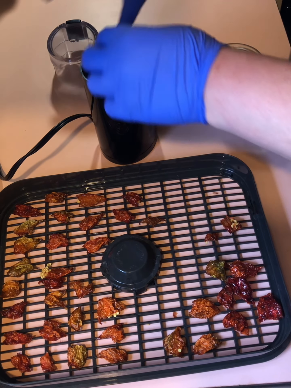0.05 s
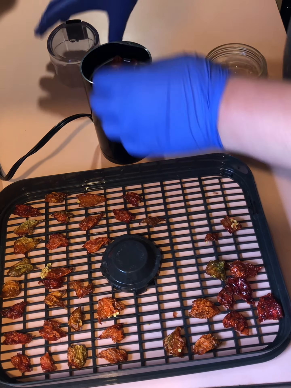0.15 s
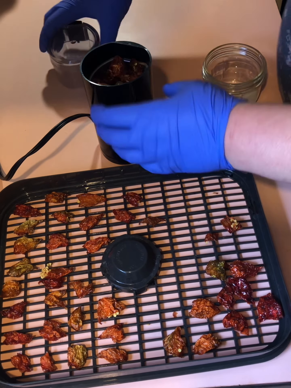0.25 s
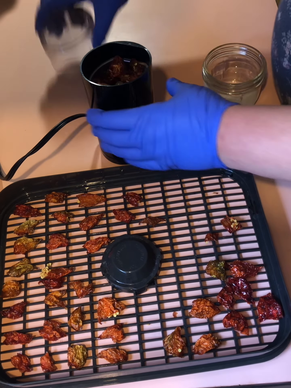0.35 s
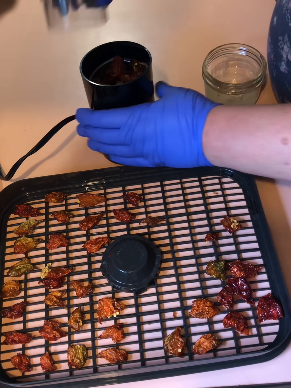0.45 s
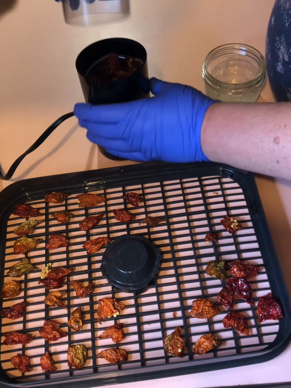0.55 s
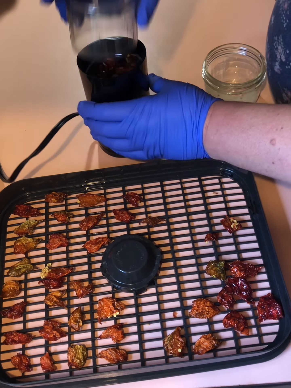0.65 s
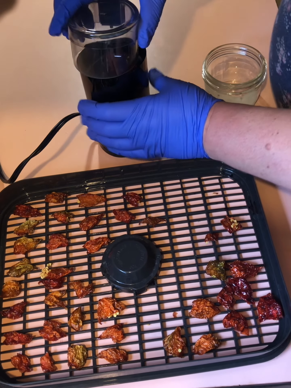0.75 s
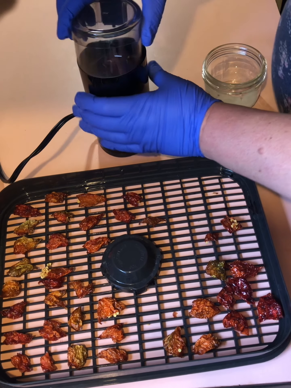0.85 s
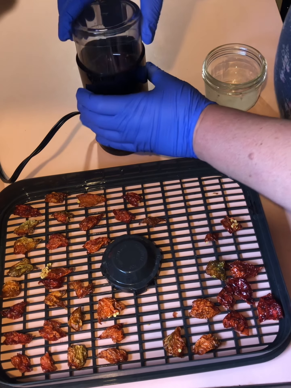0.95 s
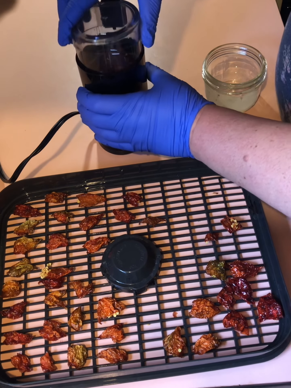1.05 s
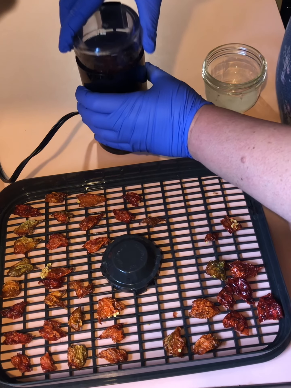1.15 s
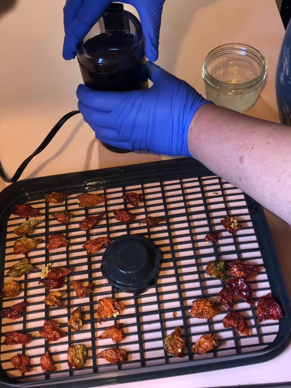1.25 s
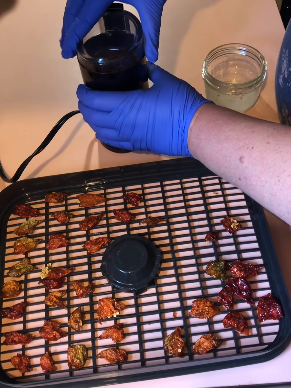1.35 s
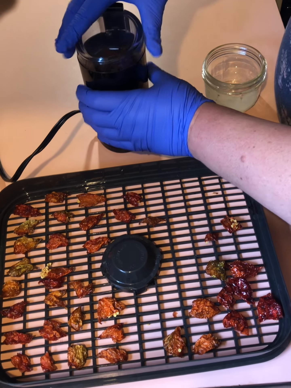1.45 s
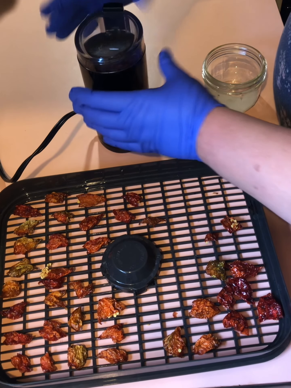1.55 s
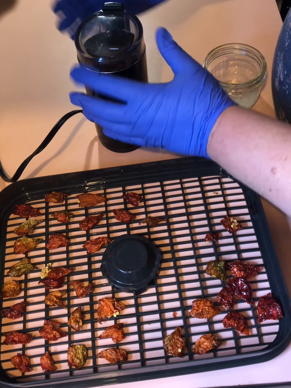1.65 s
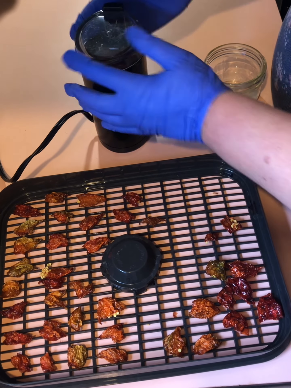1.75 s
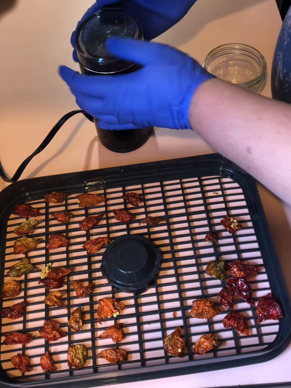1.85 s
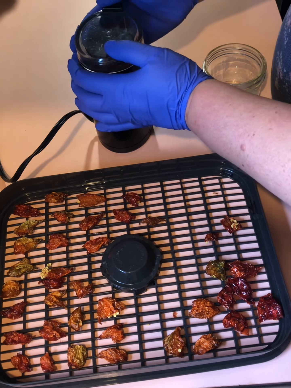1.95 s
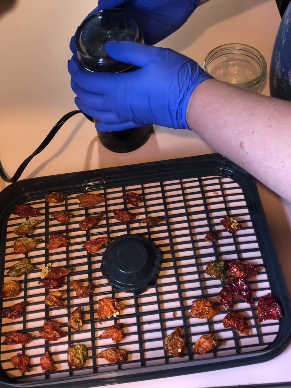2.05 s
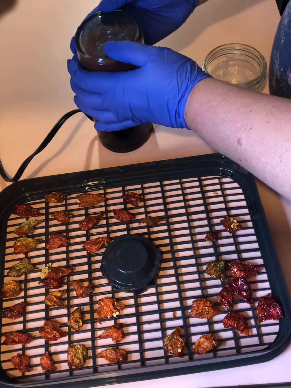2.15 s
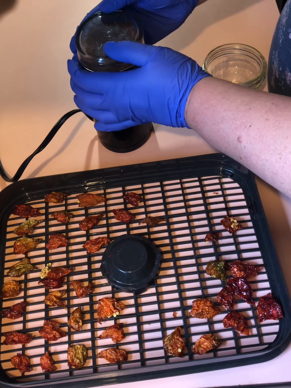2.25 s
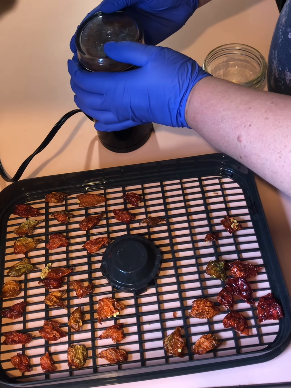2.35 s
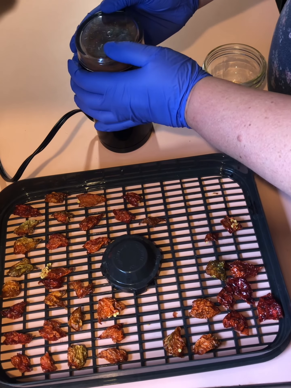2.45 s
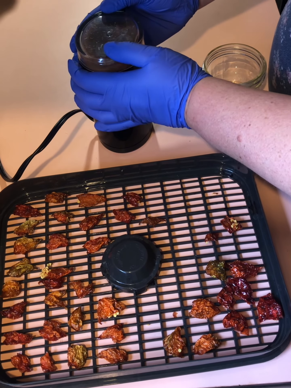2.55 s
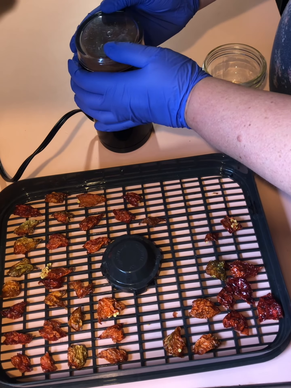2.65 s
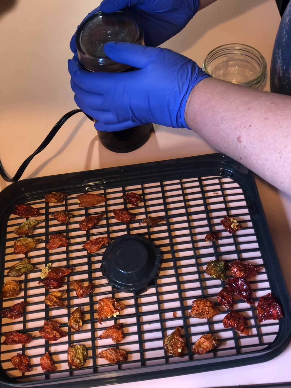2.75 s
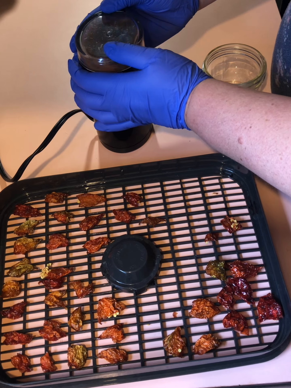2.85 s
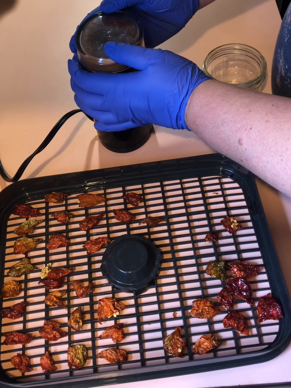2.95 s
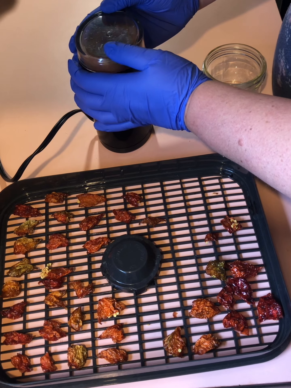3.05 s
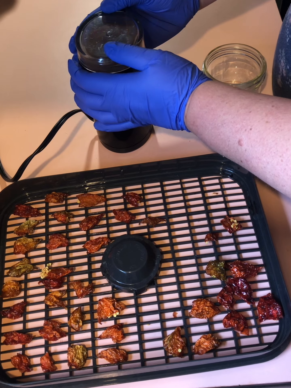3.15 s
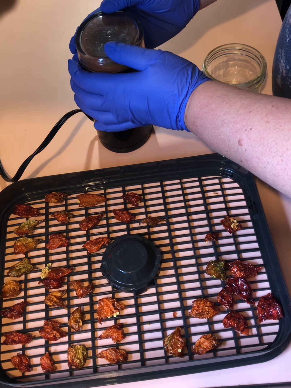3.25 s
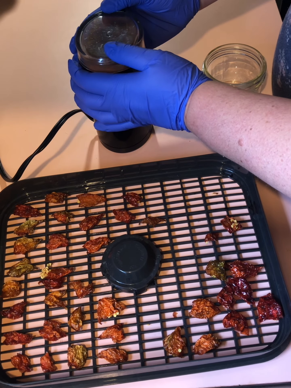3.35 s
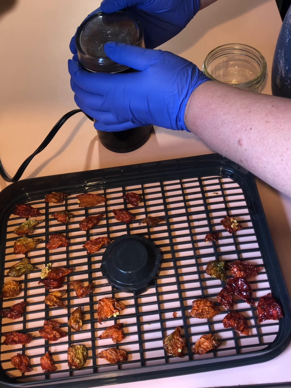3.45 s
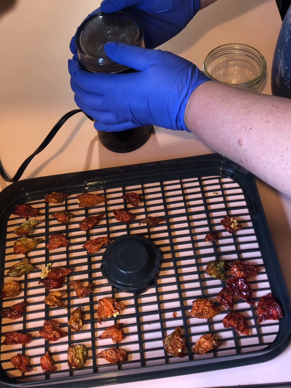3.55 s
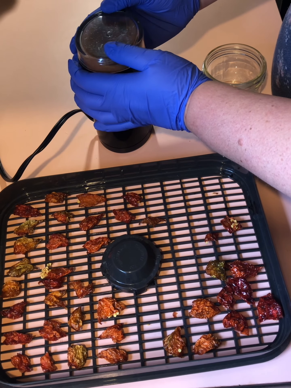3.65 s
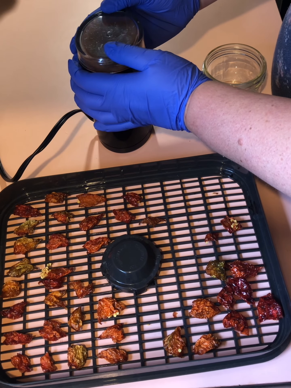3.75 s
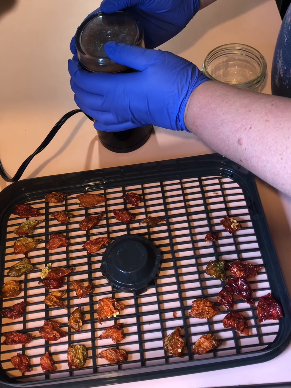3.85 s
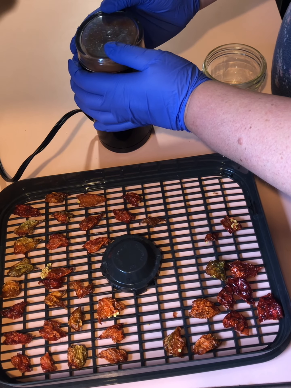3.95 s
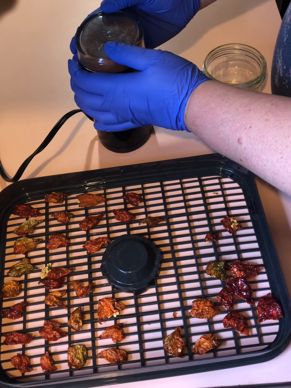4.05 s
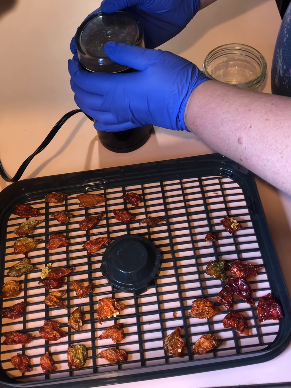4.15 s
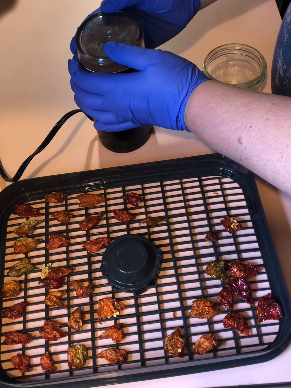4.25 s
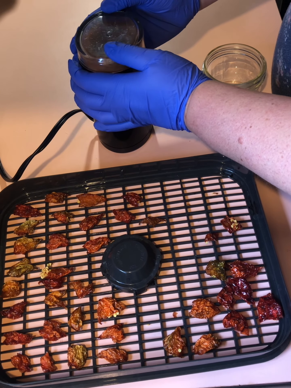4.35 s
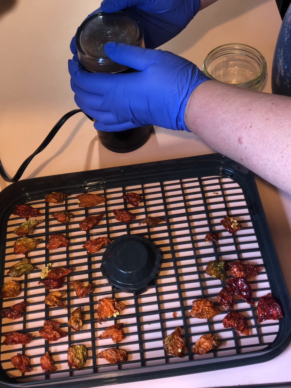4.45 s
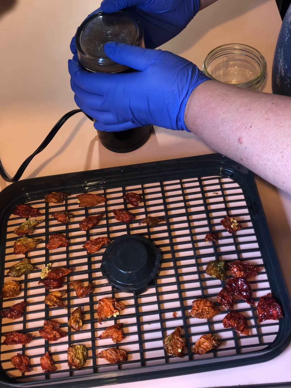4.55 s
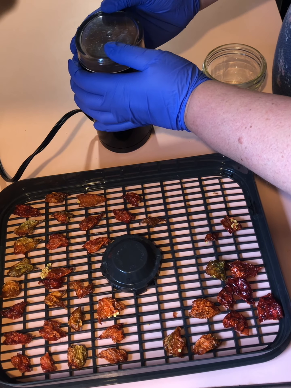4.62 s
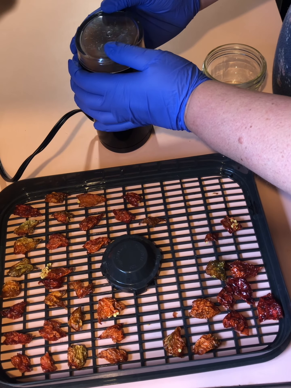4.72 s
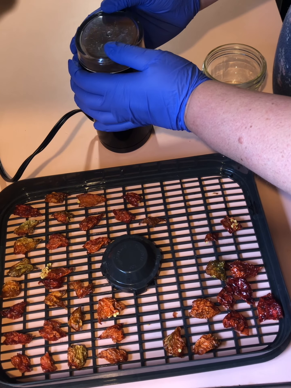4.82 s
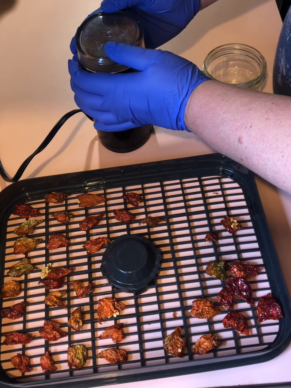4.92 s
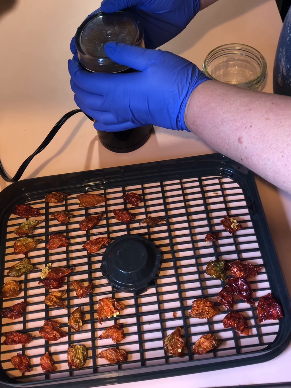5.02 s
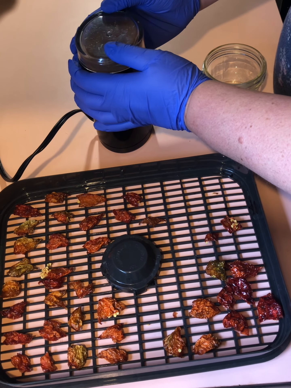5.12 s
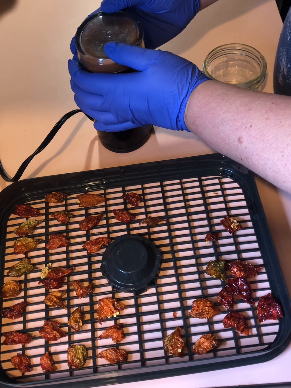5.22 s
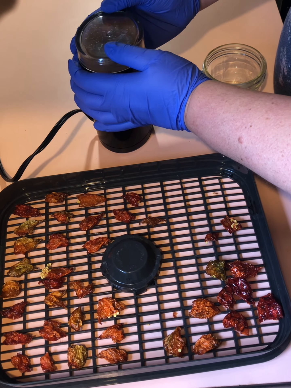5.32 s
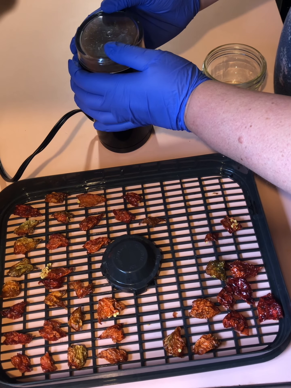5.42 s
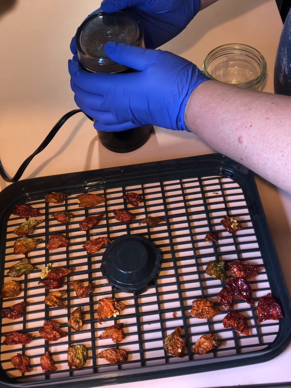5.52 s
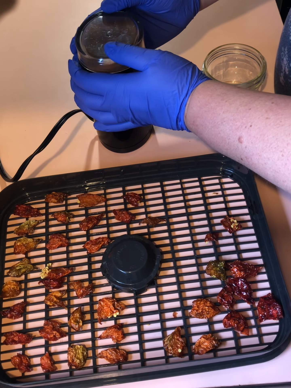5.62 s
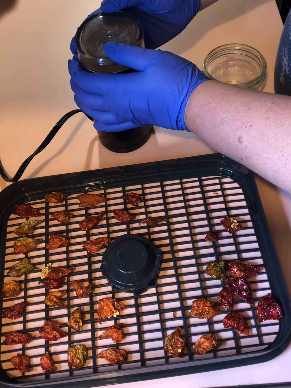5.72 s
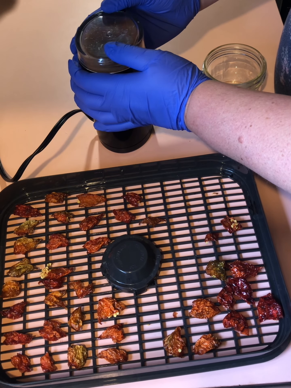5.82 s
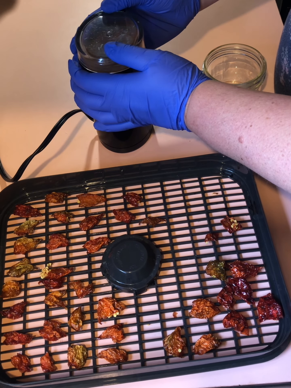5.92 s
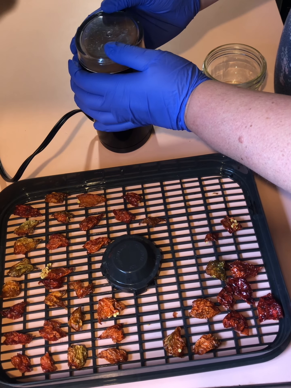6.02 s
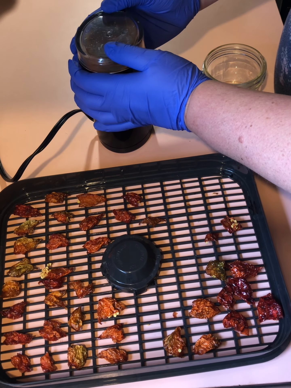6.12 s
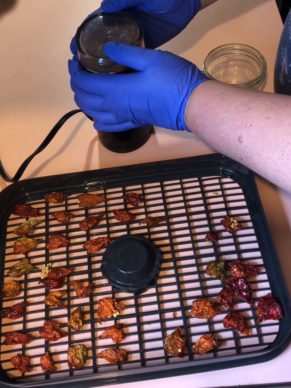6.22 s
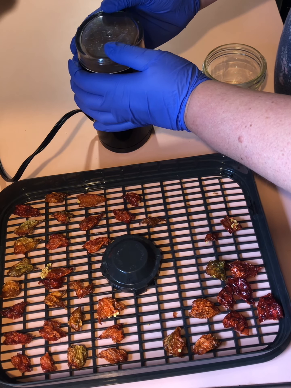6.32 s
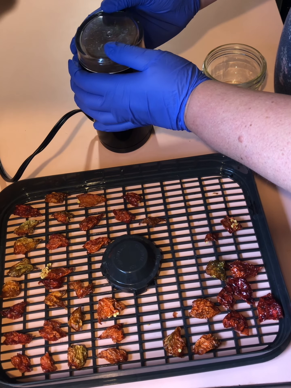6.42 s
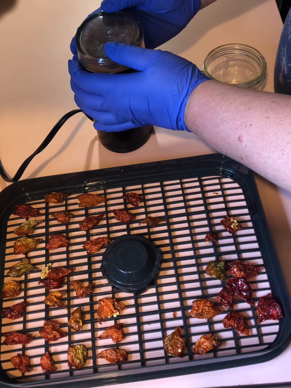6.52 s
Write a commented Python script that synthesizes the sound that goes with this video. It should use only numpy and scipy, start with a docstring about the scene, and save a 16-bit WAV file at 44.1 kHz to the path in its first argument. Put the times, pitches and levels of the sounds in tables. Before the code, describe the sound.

Gloved hands knock and slide a plastic lid onto a small electric grinder, then it whines up and grinds dried peppers over faint fan hum.

```python
"""An electric blade grinder whines up to speed in a small kitchen: orders of the rotor pitch through housing
resonances, with side tones of the mains ripple. Dried peppers are smashed and hurled round the cup: random
impacts filtered by the cup. First a gloved hand sets the plastic lid on and presses it down: struck modes,
chatter and rubbing noise. The fan of a food dehydrator hums throughout: low tones over air noise."""
import sys
import numpy as np
from scipy import signal
from scipy.fft import rfft, irfft
from scipy.io import wavfile

SR = 44100
rng = np.random.default_rng(int(sys.argv[2]) if len(sys.argv) > 2 else 0)


def inscribe(sig):
    """Save sig as 16-bit PCM at rate SR to the path in sys.argv[1].

    A 1-D sig is mono; a 2-D sig holds one channel per row.
    Samples are clipped to [-1, 1] before scaling.
    """
    pcm = np.round(np.clip(np.atleast_2d(sig).T, -1, 1) * 32767)
    wavfile.write(sys.argv[1], SR, pcm.astype(np.int16))


N = 290178
TIME_S = np.arange(N) / SR

# Dehydrator fan tones. Each row: frequency in Hz, level in dB, unsteadiness from 0 to 1.
FAN_TONES = [(56, -55, 0.1), (75.4, -52.5, 0), (121.6, -61, 0), (199.8, -47.5, 0)]
# Fan air noise. Each row: frequency in Hz, relative density in dB per Hz.
FAN_AIR_COLOUR = [(20, -71), (40, -33.5), (70, 16), (100, -3), (150, 0.5), (230, -0.5), (310, -5.5),
                  (400, -2.5), (550, -10), (1000, -11.5), (2500, -20.5), (6000, -29.5), (16000, -39)]

# A glove rubs over plastic. Each row: start in seconds, length in seconds, rustle in dB, fine hiss in dB.
GLOVE_RUBS = [(0.09, 0.04, -57, -62), (0.15, 0.12, -57, -59), (0.29, 0.18, -55.5, -70),
              (0.495, .14, -48.5, -64), (0.86, 0.18, -51, -66), (1.08, 0.17, -57, -56.5),
              (1.19, .075, -63, -59), (1.47, 0.08, -58.5, -75), (1.625, .048, -51.5, -62),
              (1.68, .07, -63, -71), (2.082, 0.056, -51, -58)]
# Dull rustle of the glove. Each row: frequency in Hz, relative density in dB per Hz.
RUSTLE_COLOUR = [(300, 5), (900, -4), (2600, -1.5), (3600, -6), (6000, -13), (16000, -34)]
# Fine hiss of the glove. Each row: frequency in Hz, relative density in dB per Hz.
HISS_COLOUR = [(2000, -41), (6000, 1), (9000, 2), (16000, -3)]
# The lid slides on the cup. Each row: start in seconds, length in seconds, singing rim in dB, dull judder in dB.
LID_SLIDES = [(0.213, 0.078, -52, -48), (0.51, 0.082, -66, -57), (0.665, 0.027, -57, -68),
              (0.77, 0.13, -68, -40.5), (0.92, .045, -43, -39.5), (1.22, 0.086, -57, -45)]
# Hollow under the sliding lid. Each row: frequency in Hz, relative density in dB per Hz.
JUDDER_COLOUR = [(60, -21), (140, 0), (240, 2), (330, -10), (450, -5.5), (750, -13), (1100, -18),
                 (4000, -27), (16000, -58)]
RUB_SWELL_SHARE, RUB_RELEASE_S = 0.29, 0.012   # swell as a share of the stroke; release time constant

# Contacts of lid, cup and worktop.
# Each row: time in seconds, then relative levels of thump, hollow ring, clack and tick in dB.
CONTACTS = [(0.066, -53, -55, -47, -24.5), (0.074, -50, -54, -49, -32), (0.154, -51, -56, -60, -42),
            (0.32, -39, -33.5, -50, -62), (0.7437, -27, -12, -22.5, -28.5), (0.7513, -29, -30, -17.5, -25),
            (0.759, -15.5, -11.5, -48, -40), (0.914, -30, -32, -35.5, -48), (0.937, -35, -44, -22, -28),
            (0.946, -29, -43, -28.5, -32), (1.12, -34.5, -53, -50, -59), (1.212, -50, -41, -38, -58),
            (1.22, -43, -41, -34, -54), (1.26, -35, -36, -29, -49), (1.284, -37, -43, -37.5, -61),
            (1.623, -57, -55, -41.5, -45), (1.825, -59, -60, -42, -63), (2.061, -56, -55, -51, -52)]
# Grinder rocking on the worktop. Each row: frequency in Hz, relative level in dB, t60 in seconds.
BASE_MODES = [(148, 0, .06), (172, -6, .06), (232, -2, .065), (265, -8, .05)]
# Hollow ring of the contacts. Each row: frequency in Hz, relative level in dB, t60 in seconds.
HOLLOW_MODES = [(450, -15, .04), (652, 2, .085), (690, -9, .05), (745, -3, .07), (920, -12, .04),
                (1130, -15, .035)]
# Wall of the lid. Each row: frequency in Hz, relative level in dB, t60 in seconds.
LID_MODES = [(1096, -12, 0.061), (1530, -9, .05), (1765, -5, .04), (1990, -4, 0.024), (2155, -8, 0.091),
             (2620, -25, 0.16), (3010, -21, .17), (3800, -18, 0.13)]
# Noise of the clacks. Each row: frequency in Hz, relative density in dB per Hz.
CLACK_COLOUR = [(300, 1), (1000, 0), (2000, 1), (3600, -0.5), (4600, -8), (7000, -15), (16000, -23)]
# Noise of the ticks. Each row: frequency in Hz, relative density in dB per Hz.
TICK_COLOUR = [(1000, 1), (4000, 1), (7500, 4.5), (11000, -4.5), (16000, -10)]
# The lid's tab knocks in its slot. Each row: time in seconds, relative level in dB.
LATCH_KNOCKS = [(1.2615, -18.5), (1.826, -40)]
# Tab and slot. Each row: frequency in Hz, relative level in dB, t60 in seconds.
LATCH_MODES = [(218, -9, 0.16), (1930, -16, 0.024), (2000, 0.5, 0.026), (3370, -27, 0.013)]

# Grinder jolted on the worktop. Each row: frequency in Hz, relative level in dB, t60 in seconds.
KICK_MODES = [(87, -3.8, 0.48), (136, -4.0, 0.12)]
# Whole pods tumbling. Each row: frequency in Hz, relative density in dB per Hz.
POD_COLOUR = [(200, -9.5), (500, -6.5), (900, -3), (1400, -10), (1900, 5), (2400, -3.5), (3200, -3.5),
              (6000, -4), (16000, -25)]
# Fine crumbs swirling in the cup. Each row: time in seconds, relative level in dB.
SWIRL = [(2.33, -27), (2.47, -19.5), (2.75, -23), (3.12, -20), (3.27, -25), (3.4, -20.5), (3.78, -23.5),
         (3.95, -19), (4.12, -24), (4.22, -18.5), (4.4, -23.5), (4.85, -23.5), (5.18, -20), (5.32, -22),
         (5.75, -22.5), (6, -20.5), (6.57, -22.5)]
# The blade bites a larger piece. Each row: peak time in seconds, relative level in dB, length in seconds.
BITES = [(2.136, -7.5, 0.007), (2.152, -11, 0.0063), (2.242, -13.5, .009), (2.274, -16.5, 0.029),
         (2.367, -6, 0.0025), (2.389, -14, 0.013), (2.51, -13.5, 0.018), (2.535, -15.5, .009),
         (2.586, -13.5, 0.016), (2.62, -20, 0.008), (2.691, -15.5, .007), (2.716, -17.5, 0.012),
         (2.749, -15, .008), (2.769, -13.5, 0.0078), (2.909, -16.5, 0.018), (2.929, -15, 0.02),
         (3.022, -15.5, .009), (3.056, -13.5, 0.0053), (3.132, -20, 0.0052), (3.19, -17.5, 0.013),
         (3.212, -16, .012), (3.305, -18.5, 0.024), (3.339, -14, 0.014), (3.44, -17, 0.0061),
         (3.603, -18, 0.017), (3.627, -14, 0.0052), (3.689, -14.5, 0.015), (3.841, -19.5, 0.0093),
         (3.866, -19, 0.014), (3.91, -20.5, 0.0092), (4.024, -17.5, 0.026), (4.24, -19, 0.0081),
         (4.284, -18.5, 0.0092), (4.413, -20, 0.01), (4.452, -21.5, 0.02), (4.628, -18, 0.023),
         (4.709, -20.5, 0.011), (4.894, -19, .01), (4.94, -18, 0.0041), (5.01, -13.5, 0.0072),
         (5.154, -13, 0.0051), (5.204, -15.5, 0.0065), (5.275, -15, 0.0021), (5.357, -19, 0.018),
         (5.718, -13.5, 0.0047), (5.777, -16.5, 0.0068), (5.806, -21, .008), (5.845, -14.5, 0.0029),
         (5.98, -19, 0.012), (6.107, -15, 0.0066), (6.445, -15.5, .01)]
# Coarser bits. Each row: frequency in Hz, relative density in dB per Hz.
SHOWER_COLOUR = [(500, -1), (1500, -4), (3300, 2.5), (6000, 0.0), (11500, -1.5), (16000, -1.5)]
# Crumbs on the cup. Each row: frequency in Hz, relative density in dB per Hz.
CRUMB_COLOUR = [(150, -23), (320, -21.5), (420, -13.5), (560, -17), (850, -15), (1250, -14), (1750, -11.5),
                (2300, -7.5), (2750, -6.5), (3300, -3), (4000, -3), (6300, -6), (8200, -0.5), (11600, -1.5),
                (16000, -5)]
# Resonances of cup and lid. Each row: frequency in Hz, width in Hz, lift in dB.
CUP_MODES = [(424, 72, 9.5), (735, 48, 7), (965, 265, 10), (1476, 180, 8.5), (2010, 250, 7), (2460, 120, 6),
             (3010, 220, 6), (3230, 130, 3.5), (3830, 205, 7.5), (4060, 140, 3.5), (4624, 115, 7),
             (5935, 710, 5.5), (7370, 190, 4), (8800, 550, 2.5), (9850, 150, 5.5), (10520, 220, 3),
             (11600, 430, 3.5)]

# Rising whistle of the motor's run-up. Each row: time in seconds, pitch in Hz, level in dB.
RUN_UP_WHISTLE = [(2.22, 2850, -57), (2.25, 3065, -30), (2.285, 3260, -17), (2.32, 3400, -28),
                  (2.36, 3520, -29), (2.38, 3700, -62)]
# Changing load drags or frees the blade. Each row: time in seconds, pitch offset in Hz.
LOAD = [(2.3, 7.98), (2.6, -11.5), (2.88, -0.16), (3.47, -1.78), (3.56, -0.1), (4.08, -4), (4.15, -3),
        (4.62, 4), (4.87, 4), (5.22, -0.33), (5.63, 0.13), (5.74, -1.04), (6.23, -4), (6.57, -0.2)]
# Orders 1 to 5 of the whine. Each row: relative level at full speed in dB, growth with speed in dB per octave,
# swell once only powder is left in dB per second.
WHINE_ORDERS = [(-31.5, 9.5, 0), (-33, 16.5, 2.1), (-30, 21, 0.8), (-43.5, 13, 4.5), (-33, 20.5, -0.5)]
# Weaker lines. Each row: order, multiples of the ripple frequency added, relative level at full speed in dB.
UPPER_ORDERS = [(2, 1, -44), (3, -1, -52), (3, 1, -42), (4, -1, -45.5), (4, 1, -43), (5, -1, -50),
                (5, 1, -40), (6, 0, -35), (6, 1, -43), (7, -1, -49), (7, 0, -40), (7, 1, -36), (8, 0, -34),
                (8, 1, -41), (9, 0, -37.5), (10, 0, -41.5), (11, 0, -43), (16, 0, -36.5), (17, 0, -38),
                (19, 0, -37.5), (21, 0, -37), (22, 0, -37), (23, 0, -38)]
# Housing resonances and dips. Each row: frequency in Hz, width in Hz, lift in dB.
HOUSING = [(295, 41, 11.5), (424.3, 68.5, 16), (467, 25, 7.5), (487.2, 3.5, -6.5), (504.4, 4.1, -4.5),
           (514.2, 15, 6.5), (842, 25, 11), (1034.6, 47, 4.5), (1177, 73, 13.5), (1290, 45, 9.5),
           (1392, 86, -9.5), (1527, 14, 5), (1895, 90, 11.5), (1998, 42, 14), (2578, 144, 6)]
SWITCH_ON_S, POWDER_FROM_S = 2.131, 4.75
FULL_SPEED_HZ, RIPPLE_HZ = 514, 120
SPIN_UP_HZ, SPIN_UP_S = 310.3, 0.150   # fast pitch gain and time constant: the rotor gathers speed
EASING_HZ, EASING_S = 109.8, 0.820     # slow pitch gain and time constant: the pieces get smaller

# Room tail. Each row: frequency in Hz, relative density in dB per Hz.
ROOM_COLOUR = [(200, -24), (700, -6.5), (1500, 6.0), (2500, 1.0), (8000, 2), (16000, -11.0)]
BASS_CUT_HZ, TOP_CUT_HZ = 42, 15900


def from_db(db):
    """Amplitude ratio."""
    return 10 ** (np.asarray(db) / 20)


def rms_one(x):
    """Scale to rms 1."""
    return x / np.sqrt(np.mean(x ** 2) + 1e-20)


def in_time(rows):
    """Interpolate each column of a curve table at every sample."""
    time_s, *columns = np.transpose(rows)
    return [np.interp(TIME_S, time_s, column) for column in columns]


def drift(rate_hz):
    """Noise of rms 1 through two equal low-pass poles at rate_hz, computed every 40 samples."""
    step = 40
    r = np.exp(-2 * np.pi * rate_hz * step / SR)
    noise = rng.standard_normal(N // step + 2002)
    slow = signal.lfilter([1], [1, -2 * r, r * r], noise)[2000:]   # settled part
    return np.interp(np.arange(N) / step, np.arange(len(slow)), rms_one(slow))


def resonance_db(hz, resonances):
    """Summed lift of the resonances at a frequency."""
    return sum(lift / (1 + (2 * (hz - centre) / width) ** 2) for centre, width, lift in resonances)


def colour(x, spectrum, resonances=(), size=4096):
    """Minimum-phase filter of unit power gain: smooth spectrum with resonant lifts."""
    hz = np.fft.rfftfreq(size, 1 / SR)
    points_hz, points_db = np.transpose(spectrum)
    db = np.interp(np.log(hz + 1), np.log(points_hz), points_db)
    db = db + resonance_db(hz, resonances)
    # folding the cepstrum makes the response causal
    cepstrum = irfft(np.log(from_db(db)))[:size // 2]
    response = irfft(np.exp(rfft(2 * cepstrum, size)))
    return signal.fftconvolve(x, response / np.linalg.norm(response))[:N]


def ring(clicks, modes):
    """Clicks set every mode ringing as a dying sine."""
    out = np.zeros(N)
    for hz, db, t60_s in modes:
        r = from_db(-60 / (t60_s * SR))
        w = 2 * np.pi * hz / SR
        sine = signal.lfilter([0, np.sin(w)], [1, -2 * r * np.cos(w), r * r], clicks + 1e-18)
        out += from_db(db) * sine
    return out


def grains(per_s, spread_db):
    """Random impacts of uneven size and either sign; rms 1."""
    sizes = from_db(spread_db * np.minimum(rng.exponential(1, N), 4))
    signs = rng.choice([-1, 1], N)
    return rms_one(sizes * signs * (rng.random(N) < per_s / SR))


def strokes(rows):
    """Per level column, a gain that swells, holds and dies away at every stroke."""
    gains = 0
    for start_s, length_s, *levels_db in rows:
        swell = np.clip((TIME_S - start_s) / (RUB_SWELL_SHARE * length_s), 0, 1)
        release = np.exp(-np.clip((TIME_S - start_s - length_s) / RUB_RELEASE_S, 0, 20))
        gains = gains + np.outer(from_db(levels_db), swell * release)
    return gains


def kitchen(x, wet_db=-13, t60_s=0.3, gap_s=0.0045):
    """Add a short diffuse tail from the walls, thin in the lows and dull at the top."""
    t = TIME_S[:SR // 2]
    tail = rng.standard_normal(len(t)) * from_db(-60 * t / t60_s) * (t > gap_s)
    wet = signal.fftconvolve(x, tail / np.linalg.norm(tail))[:N]
    return x + from_db(wet_db) * colour(wet, ROOM_COLOUR)


def fan(air_db=-48):
    """Low tones, wavering where the table says so, over soft air noise."""
    out = from_db(air_db) * colour(rng.standard_normal(N), FAN_AIR_COLOUR)
    for hz, db, unsteady in FAN_TONES:
        phase = 2 * np.pi * (hz * TIME_S + rng.random())
        in_phase = (1 + unsteady * drift(3.9)) * np.cos(phase)
        quadrature = unsteady * drift(8.4) * np.sin(phase)
        out += np.sqrt(2) * from_db(db) * (in_phase + quadrature)
    return out


def gloves():
    """Rubber slides over plastic in tiny slips."""
    rustle_gain, hiss_gain = strokes(GLOVE_RUBS)
    rustle = colour(grains(per_s=5000, spread_db=0.0), RUSTLE_COLOUR)
    hiss = colour(grains(per_s=6400, spread_db=4.0), HISS_COLOUR)
    return rustle_gain * rustle + hiss_gain * hiss


def slide(catch_db=3):
    """The snug lid judders along the cup: its dragged rim sings, the hollow under it answers dully."""
    rim_gain, hollow_gain = strokes(LID_SLIDES)
    rim = rms_one(ring(grains(per_s=2700, spread_db=10.0), LID_MODES[4:]))
    hollow = colour(grains(per_s=900, spread_db=0.5), JUDDER_COLOUR, [(660, 120, 5)])
    return rim_gain * rim * from_db(catch_db * drift(30)) + hollow_gain * hollow


def chatter(blows, peak_s):
    """Tiny impacts that swell for peak_s and die as the rim seats."""
    r = np.exp(-1 / (peak_s * SR))
    swell = signal.lfilter([np.e * (1 - r)], [1, -2 * r, r * r], blows + 1e-18)
    return swell * grains(per_s=14000, spread_db=3.5)


def lid(thump_db=0.5, hollow_db=-3.5, wall_db=-3, clack_db=-5.5, tick_db=-1.5):
    """Each contact rocks the base, rings the hollow and the wall, and chatters for a few milliseconds."""
    time_s, *part_db = np.transpose(CONTACTS)
    clicks = np.zeros((4, N))
    clicks[:, (time_s * SR).astype(int)] = from_db(part_db)
    thump, hollow, clack, tick = clicks
    body = from_db(thump_db) * ring(thump, BASE_MODES) + from_db(hollow_db) * ring(hollow, HOLLOW_MODES)
    # a small, cushioned body
    body = signal.sosfilt(signal.butter(2, [135, 1100], "band", fs=SR, output="sos"), body)
    body = np.roll(body, int(0.00194 * SR))   # it yields a moment after the rim touches
    wall = from_db(wall_db) * ring(clack, LID_MODES)
    clacks = from_db(clack_db) * colour(chatter(clack, peak_s=0.003), CLACK_COLOUR)
    ticks = from_db(tick_db) * colour(chatter(tick, peak_s=0.0023), TICK_COLOUR)
    return body + wall + clacks + ticks


def latch():
    """Focused plastic knocks as the lid comes home and is gripped."""
    snaps = np.zeros(N)
    for time_s, db in LATCH_KNOCKS:
        snaps[int(time_s * SR)] = from_db(db)
    return ring(snaps, LATCH_MODES)


def kick(level_db=-31):
    """The starting torque jolts the grinder against the worktop."""
    jolt = np.zeros(N)
    jolt[int(SWITCH_ON_S * SR)] = from_db(level_db)
    return ring(jolt, KICK_MODES)


def pods(level_db=-27, breakup_s=0.77):
    """Whole pods knock about dully and fade as they are broken up."""
    left = np.exp(-np.maximum(TIME_S - SWITCH_ON_S, 0) / breakup_s)
    knocks = grains(per_s=2500, spread_db=1.0) * left * from_db(1.8 * drift(25))
    return from_db(level_db) * colour(knocks, POD_COLOUR)


def bite_power(bite_db=1.78):
    """Power of the showers: each bite strikes suddenly, then decays."""
    power = np.zeros(N)
    for peak_s, db, length_s in BITES:
        near = slice(int((peak_s - .05) * SR), int((peak_s + .1) * SR))
        age = (TIME_S[near] - peak_s) / length_s
        strike = .5 + .5 * np.tanh(12 * (age + .38))
        power[near] += from_db(db + bite_db) ** 2 * strike * np.exp(-1.7 * np.maximum(age, 0))
    return power


def nick_power(nick_db=-19.5, per_s=45, decay_s=0.0021):
    """Power of seeds and small flakes that nick the blade at random."""
    nicks = (rng.random(N) < per_s / SR) * np.minimum(rng.exponential(1, N), 3)
    return from_db(nick_db) ** 2 * signal.lfilter([1], [1, -np.exp(-1 / (decay_s * SR))], nicks + 1e-18)


def peppers(phase, ripple, swirl_db=-1.33, clump_db=1.14, blade_share=0.21, ripple_share=0.074):
    """Fine crumbs hail on the cup in step with the blade; each bite throws a shower of coarser bits."""
    swirl = from_db(in_time(SWIRL)[0] + swirl_db + clump_db * drift(33))
    shower = np.sqrt(bite_power() + nick_power())
    coarse = colour(shower * grains(per_s=9000, spread_db=3.0), SHOWER_COLOUR)
    hail = swirl * grains(per_s=16000, spread_db=2.5) + coarse
    hail *= 1 + blade_share * np.cos(phase) + ripple_share * np.cos(ripple)
    return colour(hail, CRUMB_COLOUR, CUP_MODES)


def run_up_whistle(roughness_hz=190):
    """A rough narrow band that rises during the motor's run-up."""
    pitch_hz, db = in_time(RUN_UP_WHISTLE)
    phase = 2 * np.pi * np.cumsum(pitch_hz) / SR
    rough = drift(roughness_hz) * np.cos(phase) + drift(roughness_hz) * np.sin(phase)
    return from_db(db) * rough * (TIME_S < RUN_UP_WHISTLE[-1][0])


def motor_pitch():
    """Whine pitch in Hz: fast spin-up, slow climb as the pieces shrink, sway of the load."""
    age_s = np.maximum(TIME_S - SWITCH_ON_S, 0)
    spin_up = SPIN_UP_HZ * np.exp(-age_s / SPIN_UP_S)
    easing = EASING_HZ * np.exp(-age_s / EASING_S)
    return FULL_SPEED_HZ - spin_up - easing + in_time(LOAD)[0]


def rotor(wander=0.000902):
    """Phases of the whine and of the torque ripple, which comes twice each mains cycle."""
    ripple = 2 * np.pi * RIPPLE_HZ * TIME_S
    phase = 2 * np.pi * np.cumsum(motor_pitch() * (1 + wander * drift(9.43))) / SR
    return phase, ripple


def whine(phase, ripple, low_db=0.58, upper_db=0.5, flutter_db=0.64, shake_rad=0.022,
          early_shake_rad=0.096, settle_s=0.5):
    """Pressure dips each cycle, shaped by speed and housing; torque ripple sets side tones beside the orders."""
    pitch_hz = motor_pitch()
    speed = np.maximum(pitch_hz, 1) / FULL_SPEED_HZ
    coarse = np.exp(-np.maximum(TIME_S - SWITCH_ON_S, 0) / settle_s)   # whole pieces jostle the blade most
    powder_s = np.maximum(TIME_S - POWDER_FROM_S, 0)
    phase = phase + (shake_rad + early_shake_rad * coarse) * drift(25)
    out = np.zeros(N)
    for order, (full_db, growth_db, swell_db) in enumerate(WHINE_ORDERS, 1):
        db = full_db + growth_db * np.log2(speed) + swell_db * powder_s
        db = db + resonance_db(order * pitch_hz, HOUSING)
        flutter = flutter_db * np.sqrt(order) * drift(8) + 1.7 * order * coarse * drift(28)
        out -= from_db(db + low_db + flutter) * np.cos(order * phase)
    for order, side, db in UPPER_ORDERS:
        level = from_db(db + upper_db + 2.0 * drift(4)) * speed ** 4
        out += level * np.cos(round(order) * phase + round(side) * ripple + rng.uniform(0, 2 * np.pi))
    return out


def scene():
    """Fan and lid handling, then the running grinder; the same signal on both channels."""
    phase, ripple = rotor()
    running = np.clip((TIME_S - SWITCH_ON_S) / .003, 0, 1)
    handling = gloves() + slide()
    grinding = running * (pods() + peppers(phase, ripple) + run_up_whistle())
    in_room = kitchen(lid() + latch() + grinding)
    sound = fan() + handling + in_room + kick() + running * whine(phase, ripple)
    return np.array([sound, sound])


def record(dry):
    """The microphone drops the deepest bass, peaks are rounded, the top is cut."""
    thinned = signal.sosfilt(signal.butter(4, BASS_CUT_HZ, "high", fs=SR, output="sos"), dry)
    rounded = np.tanh(thinned)
    return signal.sosfilt(signal.ellip(12, .1, 80, TOP_CUT_HZ, fs=SR, output="sos"), rounded)


dry = scene()
out = record(dry)
inscribe(out)
```